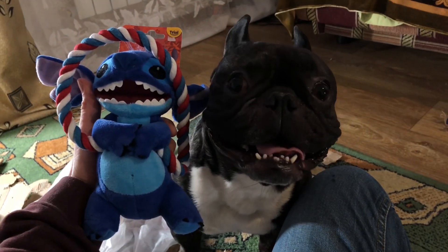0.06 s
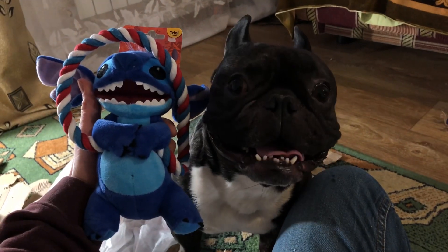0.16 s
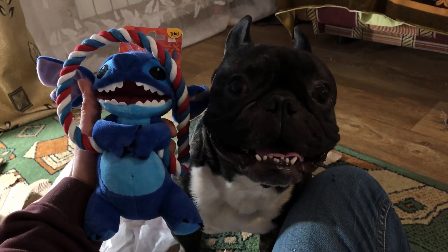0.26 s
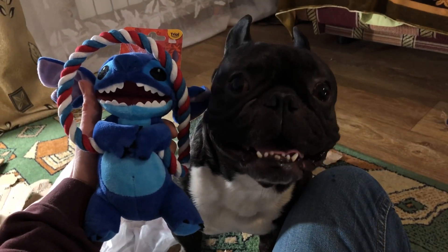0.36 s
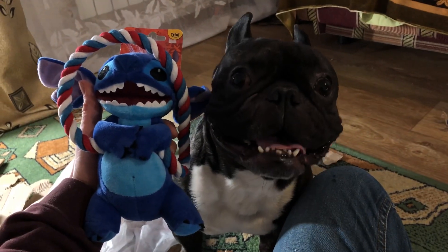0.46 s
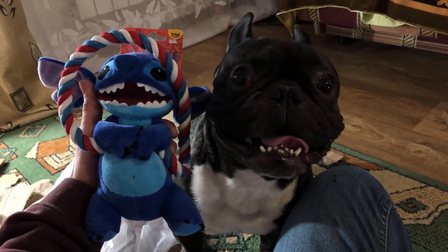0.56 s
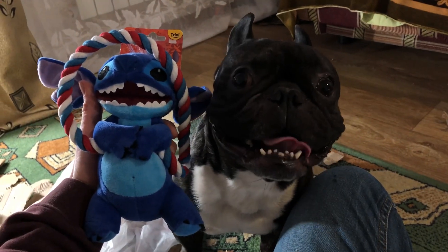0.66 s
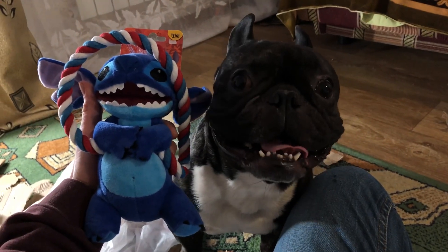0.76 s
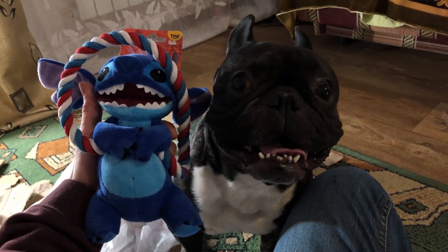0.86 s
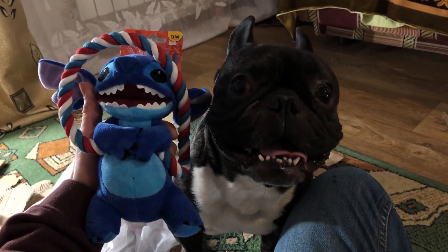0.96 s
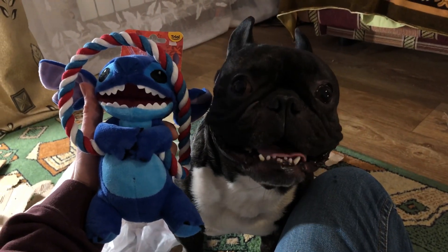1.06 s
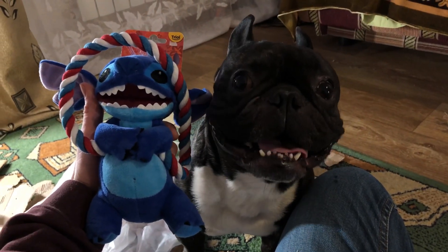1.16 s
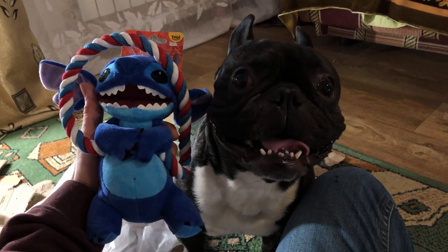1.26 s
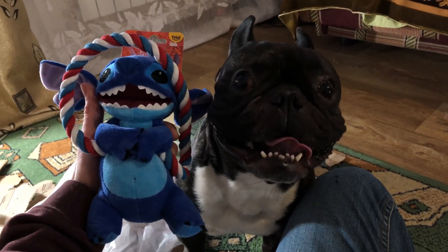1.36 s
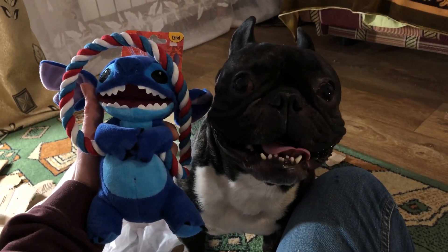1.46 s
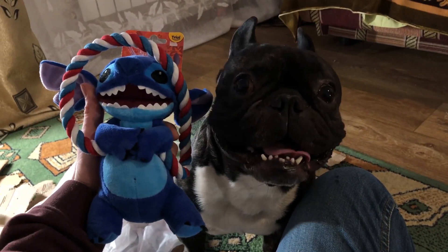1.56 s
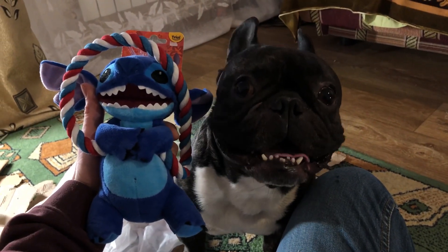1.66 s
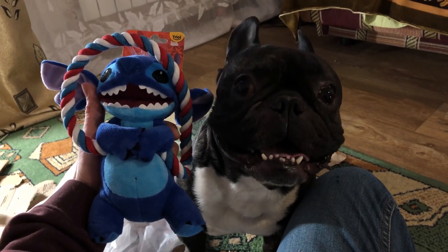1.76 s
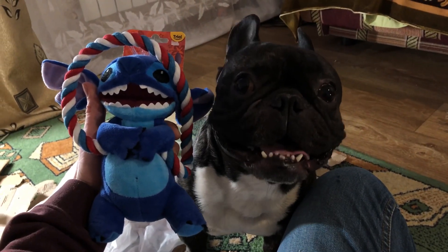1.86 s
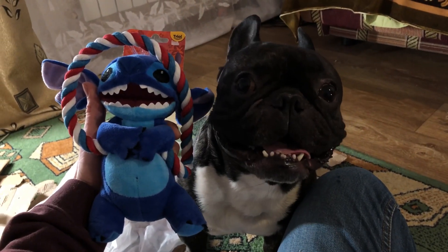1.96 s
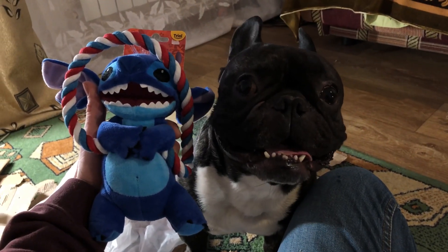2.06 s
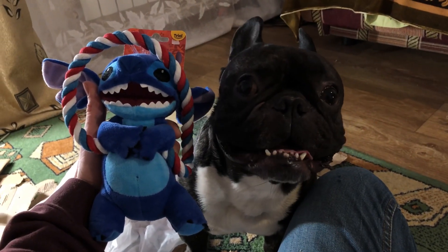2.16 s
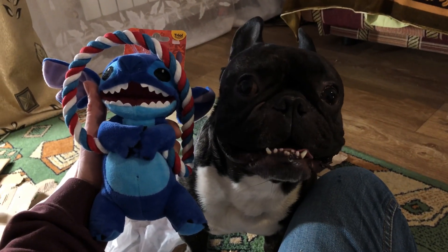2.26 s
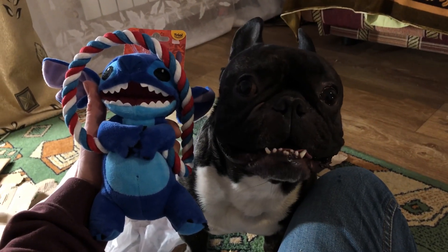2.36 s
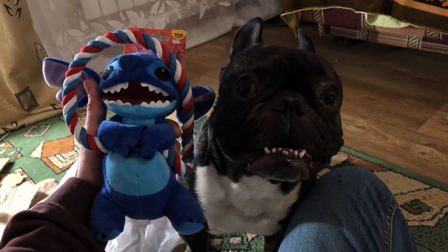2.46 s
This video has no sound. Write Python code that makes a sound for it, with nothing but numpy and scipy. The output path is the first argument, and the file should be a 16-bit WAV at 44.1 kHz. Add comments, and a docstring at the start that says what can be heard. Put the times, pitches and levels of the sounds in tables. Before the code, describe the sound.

A small dog growls roughly three times, each growl ending in a sharp snort.

```python
"""Small dog growling and snorting

A flat-faced dog, close up in a furnished room: three rattling growls, each cut off by a sharp snort.
Slack throat tissue slaps irregularly in the growl; in the snort it flutters about fifty times a second,
chopping the air driven through the nose. Faint room tone and two soft, deep drones lie underneath."""
import sys
import numpy as np
from scipy import signal
from scipy.io import wavfile
from scipy.ndimage import uniform_filter1d

SR = 44100
rng = np.random.default_rng(int(sys.argv[2]) if len(sys.argv) > 2 else 0)


def unload_audio(sound):
    """Save the sound as a 16-bit wav file, at the path given as the first command line argument."""
    columns = np.transpose(np.atleast_2d(sound))
    # keep every value between -1 and 1, then stretch to whole-number steps
    steps = np.round(np.clip(columns, -1, 1) * 32767)
    wavfile.write(sys.argv[1], SR, steps.astype(np.int16))


N = 110250
TIME = np.arange(N) / SR

# Colour of the room tone (frequency [Hz], level [dB])
ROOM_TONE_EQ = [(25, -12.5), (70, -5.5), (190, -1), (270, -10.5), (500, -13), (1000, -19.5),
                (2100, -25), (15000, -33)]
# Deep drones (start [s], length [s], start pitch [Hz], end pitch [Hz], level [dB])
DRONES = [(0.596, 0.288, 63.57, 90.1, -59), (1.852, 0.297, 68.4, 68.5, -69)]
# Reverb decay (frequency [Hz], t60 [s])
REVERB_T60 = [(70, 0.8), (200, 0.3), (1100, 0.7), (1550, 1.1), (3150, 0.68), (3900, 0.5), (7000, 0.3),
              (14000, 0.03)]
# Colour of the reverb (frequency [Hz], level [dB])
REVERB_EQ = [(70, -6), (140, -11), (300, -11), (1200, -21.5), (1550, -25), (2700, -25), (3080, -13),
             (3500, -25), (6500, -15), (14000, -21)]
# Standing waves of the room (frequency [Hz], t60 [s], level [dB])
ROOM_MODES = [(71.3, 0.99, 6), (118.1, 0.595, -6), (142.5, 0.53, -3)]
# Gulps deep in the throat (time [s], pitch [Hz], level [dB])
GULPS = [(.557, 146, -41), (0.761, 260, -40), (.858, 135, -40.5), (1.286, 136, -40.5),
         (1.432, 146.5, -43.5)]
# Hard, throaty pushes (start [s], length [s], level [dB])
GRUNTS = [(0.526, 0.0418, -52.5), (0.741, .035, -48.5), (0.787, .03, -53), (0.834, 0.04, -52.5)]
# Colour of the grunts (frequency [Hz], level [dB])
GRUNT_EQ = [(60, -19.5), (240, 3.5), (470, -1), (620, -16), (5000, -68)]
# One envelope per growl (time [s], rasp level [dB], rumble level [dB])
GROWL_ENVELOPES = [
    [(0.0, -48, -54), (0.06, -50.5, -50.5), (0.104, -53, -67.5), (0.156, -56.5, -58), (0.176, -67, -59)],
    [(0.43, -70.5, -72), (0.488, -52, -64.5), (0.558, -47.5, -48), (0.608, -53.5, -73), (0.658, -48.5, -50),
     (0.686, -57.5, -59.5), (0.802, -42.5, -46.5), (0.828, -47.5, -57), (0.862, -45.5, -54),
     (0.886, -50, -55), (0.9, -69, -57)],
    [(1.12, -82.5, -70), (1.165, -52.5, -65), (1.27, -44.5, -47.5), (1.362, -53, -63.5),
     (1.422, -48.5, -46), (1.428, -58, -50.5), (1.498, -53, -62), (1.56, -57, -57.5), (1.572, -64, -58)],
]
# Resonances of the throat (frequency [Hz], nominal width [Hz], level [dB])
THROAT_FORMANTS = [(489, 284, -11.5), (1352, 290, 1), (2280, 235, 0.5), (3557, 310, -13), (4410, 250, -7.5),
                   (5420, 260, -20.5), (6425, 430, -21), (8890, 1100, -28), (11370, 900, -30),
                   (13760, 1300, -31)]
# The hardest slaps of the growls (time [s], level relative to the rasp [dB])
HARD_SLAPS = [(0.117, 6.5), (0.516, 1.5), (.575, 1), (0.662, 6), (0.795, -2), (1.283, 5.5), (1.383, 9.5)]
# Low body of each slap (frequency [Hz], level [dB])
CHEST_EQ = [(40, -33), (68, -5.5), (130, 0.5), (175, -11), (280, -17.5), (800, -29), (2500, -66)]
# Tilt of the teeth hiss on top of the throat's colour (frequency [Hz], level [dB])
TEETH_EQ = [(500, -20), (4400, -3), (14000, 11)]
# Snorts; hold and release count from the first flap (start [s], first flap [s], hold [s], release [s],
# level [dB], flap rate [Hz], rate gained per flap [Hz], starting nostril pitch [Hz])
SNORTS = [(0.187, 0.22, 0.085, 0.13, -34, 47, .3, 1480), (0.895, 0.934, 0.061, 0.14, -33, 52, 0.97, 1384),
          (1.581, 1.617, 0.049, 0.14, -33.5, 50, 3.71, 1300)]
# Colour of the nose (frequency [Hz], level [dB])
NOSE_EQ = [(60, -34), (150, -5), (270, -22), (420, -12), (1000, -14), (1250, -2), (1560, -1.5), (1740, -8),
           (2250, -7.5), (2850, -15.5), (3100, -11), (3750, -12), (4250, -20), (4850, -12.5), (5400, -24.5),
           (6500, -17), (7900, -25), (8600, -18), (9400, -18.5), (10800, -25), (11500, -23), (12300, -26.5),
           (15500, -30.5)]
# Colour of the flaps' thumps (frequency [Hz], level [dB])
THUMP_EQ = [(25, -38.5), (50, -13), (90, -2), (140, 3.5), (190, -10.5), (280, -18.5), (480, -6),
            (900, -35.5), (2500, -50)]

RATTLE_PER_S, SPIT_PER_S, PUFF_S, THROAT_SWAY_HZ = 64, 400, 0.0026, 64.8
RASP_DB, SPIT_DB, RUMBLE_DB = -0.5, -7, -1
ATTACK_S, SWELL_DB_PER_S, SAG_DB_PER_S, RELEASE_S = 0.027, 20, 131, 0.012
FLAP_OPEN_S, FLAP_SHUT_S, FLAP_LEAK = 0.0034, 0.0014, 0.43
FLAP_JITTER_S, FLAP_SPREAD_DB, FLUTTER_S = 0.0006, 1.47, 0.1163
NOSTRIL_END_HZ, NOSTRIL_WIDTH_HZ, GLIDE_AT_S, GLIDE_S = 1519, 102, 0.054, 0.035
JET_HZ, JET_DB, THUMP_DB, NOSTRIL_DB = 6000, -12.5, -13.5, -6


def amp(db):
    return 10 ** (np.asarray(db) / 20)


def unit(x):
    return x / np.sqrt(np.mean(x ** 2) + 1e-20)


def noise():
    return rng.standard_normal(N)


def read(points, hz):
    """A table's value on a log-frequency axis."""
    f, value = np.transpose(points)
    return np.interp(np.log(hz + 1), np.log(f + 1), value)


def colour(x, eq, size=4096):
    """Causal filter of unit energy; eq is a table of levels or a gain function of frequency."""
    hz = abs(np.fft.fftfreq(size, 1 / SR))
    log_gain = np.log(eq(hz) if callable(eq) else amp(read(eq, hz)))
    taps = np.fft.ifft(np.exp(np.conj(signal.hilbert(log_gain)))).real[:size // 2]
    return signal.oaconvolve(x, taps / np.linalg.norm(taps))[:N]


def peak(hz, centre, width):
    """Gain of one steep-sided resonance."""
    return 1 / (1 + ((hz - centre) / (.78 * width)) ** 2)


def resonate(x, hz, width):
    """A steep resonance that follows the pitch curve hz."""
    carrier = np.exp(2j * np.pi * np.cumsum(hz) / SR)
    r = np.exp(-np.pi * width / SR)
    band = signal.lfilter([(1 - r) ** 2], [1, -2 * r, r * r], x / carrier + 1e-18)
    return 2 * (carrier * band).real * np.sqrt(2 / (1 - r))


def swell(start, length, db, fade_s):
    """An envelope that fades in, holds and fades out."""
    return amp(db) * np.clip(np.minimum(TIME - start, start + length - TIME) / fade_s, 0, 1)


def contour(points, column):
    """Gain along a level curve, silent outside it."""
    times, db = np.array(points)[:, [0, column]].T
    return (TIME >= times[0]) * (TIME <= times[-1]) * amp(np.interp(TIME, times, db))


def slaps(per_s, jitter, spread_db, count=400):
    """Unevenly spaced clicks of uneven size, at unit power."""
    gap, size = rng.standard_normal((count, 2)).T
    at = (np.cumsum(np.exp(jitter * gap)) / per_s * SR).astype(int)
    clicks = np.zeros(N)
    clicks[at[at < N]] = amp(spread_db * np.clip(size, -2, 2))[at < N]
    return unit(clicks)


def room_tone():
    """A dark noise bed, plus a faint hollow band that fades away around the third snort and returns."""
    dip = np.interp(TIME, [1.0, 1.5, 1.65, 2.15], [1, 0, 0, 1])
    hollow = dip * colour(noise(), lambda hz: peak(hz, centre=540, width=86))
    return amp(-76) * hollow + amp(-71) * colour(noise(), ROOM_TONE_EQ)


def drone(start, length, from_hz, to_hz, db):
    """A soft, deep tone with an octave almost as strong."""
    pitch = np.interp(TIME, [start, start + length], [from_hz, to_hz])
    phase = 2 * np.pi * np.cumsum(pitch) / SR
    return swell(start, length, db, fade_s=0.0385) * (np.sin(phase) + amp(-1.5) * np.sin(2 * phase))


def reverb(x):
    """The room's weak, diffuse tail; deep bass and mids linger, the top dies fast."""
    hz, t, spectrum = signal.stft(rng.standard_normal(SR), SR, nperseg=1024)
    t60 = read(REVERB_T60, hz)[:, None]
    gain = amp(read(REVERB_EQ, hz))[:, None] * np.sqrt(2 * np.log(1000) / (t60 * SR))
    tail = signal.istft(spectrum * gain * np.exp(-np.log(1000) * t / t60), SR, nperseg=1024)[1][:SR]
    fade_in = np.minimum(TIME[:SR] / 0.0057, 1)
    return signal.fftconvolve(x, tail * fade_in)[:N]


def standing_waves(x):
    """Low room modes that hum on after each push."""
    ring = np.zeros(N)
    for hz, t60, db in ROOM_MODES:
        decay = np.log(1000) / t60
        ring += amp(db) * 2 * decay / SR * np.exp(-decay * TIME) * np.cos(2 * np.pi * hz * TIME)
    return signal.fftconvolve(x, ring)[:N]


def gulp(at, hz, db, decay_s=0.0065):
    """One heavy slap deep in the throat: a few cycles of a low tone."""
    return amp(db) * np.exp(-abs(TIME - at) / decay_s) * np.sin(2 * np.pi * hz * (TIME - at))


def grunts():
    """Hard pushes drive quick, full pulses low in the throat."""
    pushes = sum(swell(*row, fade_s=0.0086) for row in GRUNTS)
    return colour(slaps(per_s=85, jitter=.2, spread_db=1.52) * pushes, GRUNT_EQ)


def throat(x, shift_hz, tilt_db=np.zeros_like):
    """The throat's formants, all shifted together, under an optional tilt."""
    def gain(hz):
        power = sum((amp(db) * peak(hz, f + shift_hz, width)) ** 2 for f, width, db in THROAT_FORMANTS)
        return amp(tilt_db(hz)) * np.sqrt(power)
    return colour(x, gain)


def teeth_hiss(gate):
    """Pulsing air hisses past the teeth at the height of the second growl."""
    air = gate * noise() * swell(start=0.7163, length=0.17, db=-56.5, fade_s=0.0211)
    return throat(air, 0, lambda hz: read(TEETH_EQ, hz))


def growls():
    """Each slap lets a puff of air and specks of spit into the shifting throat, and thumps the chest."""
    rasp_level = sum(contour(points, 1) for points in GROWL_ENVELOPES)
    rumble_level = sum(contour(points, 2) for points in GROWL_ENVELOPES)
    rattle = slaps(RATTLE_PER_S, jitter=.45, spread_db=2)
    puffs = signal.oaconvolve(rattle, signal.windows.gaussian(1001, PUFF_S * SR), "same")
    gate = unit(1 + unit(puffs))  # air keeps leaking between slaps
    accents = sum(amp(db) * np.exp(-.5 * ((TIME - at) / PUFF_S) ** 2) for at, db in HARD_SLAPS)
    air = amp(RASP_DB) * np.hypot(gate, accents) * noise()
    spit = amp(SPIT_DB) * gate * slaps(SPIT_PER_S, jitter=.8, spread_db=1, count=1600)
    drive = (air + spit) * rasp_level
    # The moving tongue crossfades between two throat shapes.
    wander = unit(uniform_filter1d(uniform_filter1d(noise(), size=600), size=600))
    tongue = .5 + .5 * np.tanh(2 * wander)
    rasp = throat(drive * tongue, THROAT_SWAY_HZ) + throat(drive * (1 - tongue), -THROAT_SWAY_HZ)
    rumble = amp(RUMBLE_DB) * colour(rattle * rumble_level, CHEST_EQ)
    return rasp + teeth_hiss(gate) + rumble


def palate_blast(start, first_flap, hold, release, db, per_s, quickening, nostril_hz, flaps=9):
    """The palate pops open and flutters: returns chopped flow, thumps, nostril ring and smooth flow."""
    t = TIME - first_flap
    attack = np.clip((TIME - start) / ATTACK_S, 0, 1) ** 2
    body_db = SWELL_DB_PER_S * np.minimum(t - hold, 0) - SAG_DB_PER_S * np.maximum(t - hold, 0)
    envelope = attack * amp(db + body_db) * np.exp(-np.maximum(t - release, 0) / RELEASE_S)
    late, size = rng.standard_normal((flaps, 2)).T
    gate, thumps = np.full(N, FLAP_LEAK), np.zeros(N)
    thumps[round((start + ATTACK_S / 2) * SR)] = 0.25  # the opening pop
    gaps = 1 / (per_s + quickening * np.arange(flaps))
    flap_times = np.cumsum(gaps) - gaps + FLAP_JITTER_S * late
    for at, gain in zip(flap_times, amp(FLAP_SPREAD_DB * size)):
        gain /= 1 + (abs(at) / FLUTTER_S) ** 20  # the flutter stops abruptly
        gate += gain * np.exp(-.5 * ((t - at) / np.where(t < at, FLAP_OPEN_S, FLAP_SHUT_S)) ** 2)
        thumps[round((first_flap + at + .002) * SR)] = gain  # lands as the flap shuts
    glide = .5 + .5 * np.tanh((t - GLIDE_AT_S) / GLIDE_S)
    pitch = nostril_hz + (NOSTRIL_END_HZ - nostril_hz) * glide
    ring = resonate(gate * noise(), pitch, NOSTRIL_WIDTH_HZ)
    return envelope * np.array([gate, thumps * np.sqrt(SR / per_s), ring, np.ones(N)])


def snorts():
    """Wet, grainy air through the nose, a smooth jet hiss, thumps and a rising nostril ring."""
    chopped, thumps, nostril, flow = sum(palate_blast(*row) for row in SNORTS)
    grain = unit(np.exp(0.33 * unit(uniform_filter1d(noise(), size=50))))
    nose = colour(chopped * grain * noise(),
                  lambda hz: amp(read(NOSE_EQ, hz)) / np.hypot(1, hz / (2 * JET_HZ)))  # softened top
    jet = colour(flow * noise(),
                 lambda hz: amp(read(NOSE_EQ, hz)) * (hz + 1) / np.hypot(hz, JET_HZ))  # thinned lows
    return nose + amp(JET_DB) * jet + amp(THUMP_DB) * colour(thumps, THUMP_EQ) + amp(NOSTRIL_DB) * nostril


def scene():
    """The dog and the room's answer over a quiet bed, in mono."""
    dog = growls() + grunts() + sum(gulp(*row) for row in GULPS) + snorts()
    bed = room_tone() + sum(drone(*row) for row in DRONES)
    return (bed + reverb(dog) + standing_waves(dog) + dog)[None]


def record(dry):
    """A steep low-pass trims the very top."""
    taps = signal.firwin(511, cutoff=15750, window=("kaiser", 9), fs=SR)
    return signal.oaconvolve(dry, taps[None], "same")


dry = scene()
out = record(dry)
unload_audio(out)
```